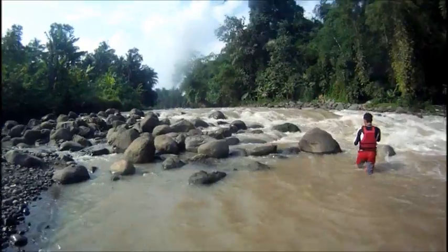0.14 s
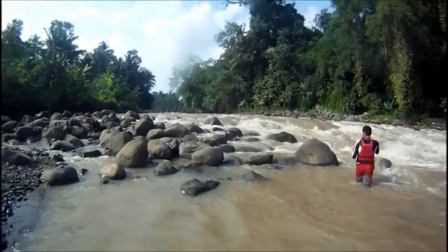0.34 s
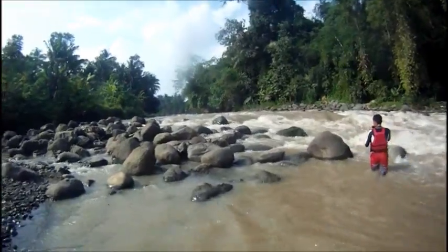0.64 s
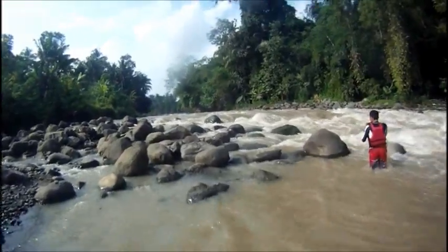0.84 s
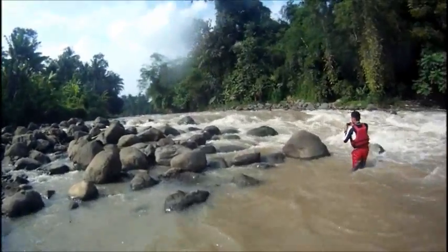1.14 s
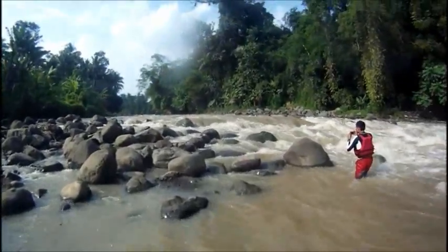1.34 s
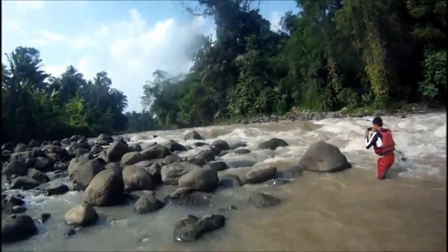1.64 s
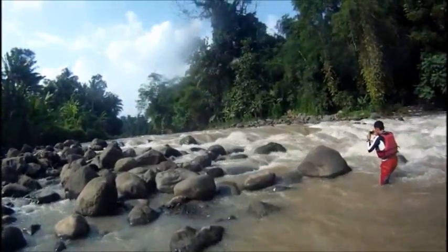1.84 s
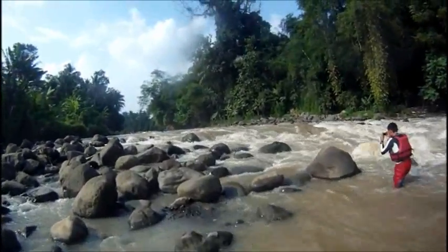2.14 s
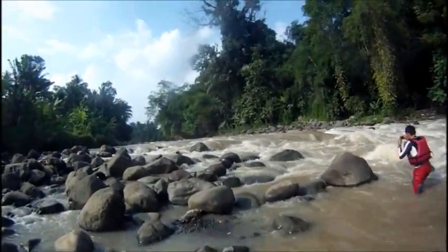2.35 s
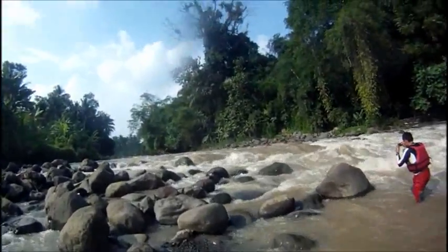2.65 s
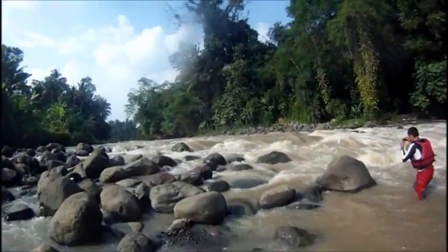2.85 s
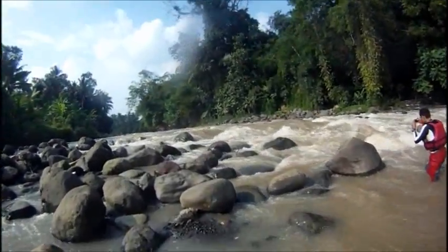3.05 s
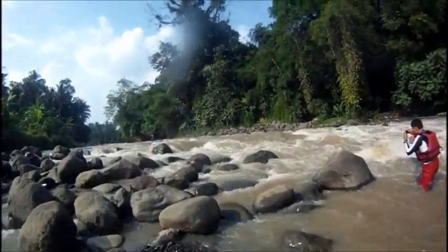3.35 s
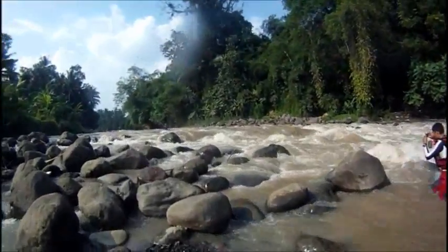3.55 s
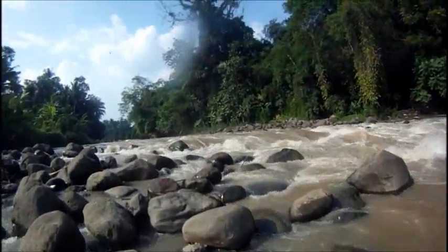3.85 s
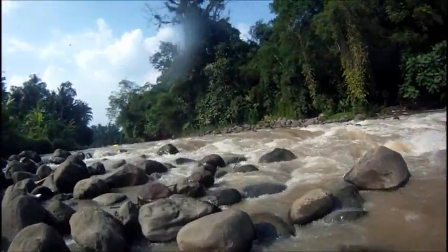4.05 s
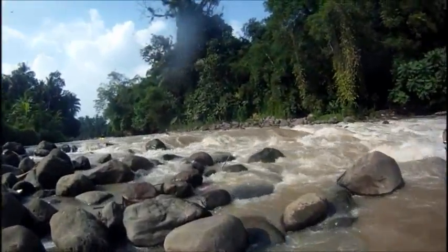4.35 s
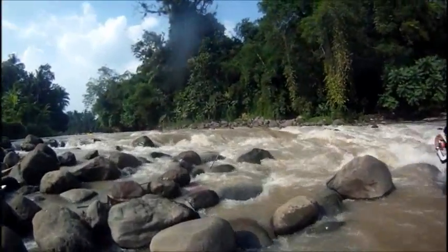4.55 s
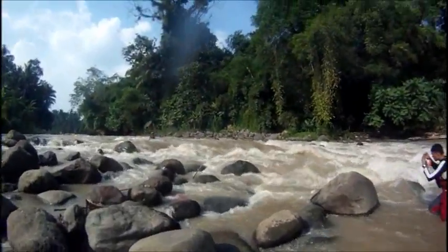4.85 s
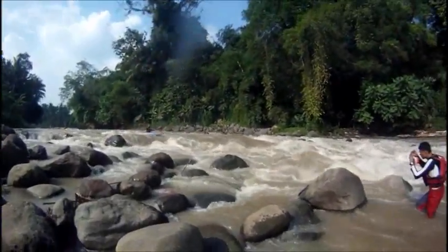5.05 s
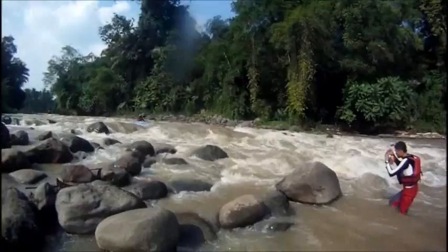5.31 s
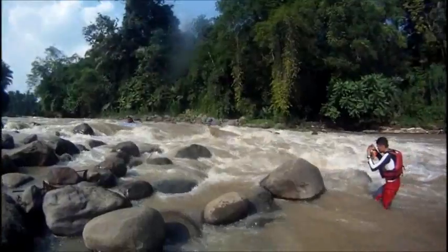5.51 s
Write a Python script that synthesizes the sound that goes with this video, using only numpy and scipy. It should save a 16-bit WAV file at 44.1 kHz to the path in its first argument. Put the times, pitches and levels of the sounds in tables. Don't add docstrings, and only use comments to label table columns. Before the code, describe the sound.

A rocky river roars steadily, muffled and boxy inside a sealed camera housing, while low knocks, thumps and plastic clicks jolt the microphone.

```python
import sys
import numpy as np
from scipy import signal
from scipy.io import wavfile
from scipy.ndimage import uniform_filter1d

SR = 44100
rng = np.random.default_rng(int(sys.argv[2]) if len(sys.argv) > 2 else 0)


def unload_wav(signal):
    wavfile.write(
        sys.argv[1],
        SR,
        np.round(np.clip(np.atleast_2d(signal).T, -1, 1) * 32767).astype(np.int16),
    )


def level_to_linear(level):
    exponent = np.asarray(level, float) / 20
    return 10 ** exponent


N = 250488


def evened(x):
    return x / np.sqrt(np.mean(x ** 2) + 1e-20)


def add(mix, start_s, sound):
    part = mix[round(start_s * SR):][:len(sound)]
    part += sound[:len(part)]


def resonate(x, hz, width_hz):
    radius = np.exp(-np.pi * width_hz / SR)
    turn = np.exp(2j * np.pi * hz / SR)
    return 2 * signal.lfilter([1 - radius], [1, -radius * turn], x).real


def ring(x, modes):
    total = 0
    for k, (hz, width_hz, level_db) in enumerate(modes):
        mode = resonate(resonate(x, hz, width_hz), hz, 2 * width_hz)
        total = total + (-1) ** k * level_to_linear(level_db) * mode
    return total


def noise_field(points, patchy_db, flicker_db, size):
    frames = 4 * N // size + 5
    bin_hz = np.fft.rfftfreq(size, 1 / SR)
    real, imag, patches = rng.standard_normal((frames, len(bin_hz), 3)).T
    patches = uniform_filter1d(patches, size=5, axis=0)
    patches = evened(uniform_filter1d(patches, size=9, axis=1))
    flicker = evened(uniform_filter1d(rng.standard_normal(frames), size=3))
    hz, level_db = np.transpose(points)
    field_db = np.interp(np.log(bin_hz + 1), np.log(hz + 1), level_db)[:, None]
    field_db = field_db + patchy_db * patches + flicker_db * flicker
    spectra = (real + 1j * imag) * level_to_linear(field_db)
    return evened(signal.istft(spectra, nperseg=size, noverlap=3 * size // 4)[1][:N])


# pitch_hz, width_hz, level_db
SHELL_MODES = [
    (640, 940, -7),
    (883, 325, 11),
    (1060, 520, -0.5),
    (1565, 243, 5.5),
]
# pitch_hz, width_hz, level_db
UPPER_MODES = [
    (2072, 496, 5.5),
    (2330, 210, -2.5),
]


def splashes(per_s, spread_db):
    modes = SHELL_MODES[-1:] + UPPER_MODES
    size = level_to_linear(spread_db * np.minimum(rng.exponential(1, N), 3)) * (rng.random(N) < per_s / SR)
    which = rng.integers(0, len(modes), N) == np.arange(len(modes))[:, None]
    decay = np.exp(-1 / (0.02 * SR))
    bursts = rng.standard_normal(N) * signal.lfilter([1], [1, -decay], size * which)
    return evened(sum(ring(burst, [mode]) for burst, mode in zip(bursts, modes)))


# start_s, level_db
ROAR_LEVEL = [(0.03, -46), (0.82, -45), (1.3, -45.5), (1.6, -44.5), (2.37, -45.5), (3.35, -42.5),
              (3.77, -44.5), (4.3, -43.5), (4.9, -43), (5.4, -46), (5.68, -45.5)]
# pitch_hz, level_db [dB per Hz]
ROAR_SPECTRUM = [(180, -26), (300, 2), (330, -12.5), (505, -5.5), (572, -30), (636, -1), (749, -11.5),
                 (786, -5.5), (908, -1.5), (1120, -12), (1390, -5), (1730, -7), (2270, 4), (2800, -10.5),
                 (3000, -48), (3900, -63), (6600, -120)]
# pitch_hz, level_db [dB per Hz]
SPRAY_SPECTRUM = [(1650, -3.5), (2800, -51), (2980, -0.5), (3430, -1.5), (3700, 0), (4090, -8),
                  (4910, -6.5), (5070, -3.5), (5310, -1.5), (5880, -8), (5950, -20), (7740, -40),
                  (13100, -120)]
# pitch_hz, level_db [dB per Hz]
RUMBLE_SPECTRUM = [(11, -32), (18, 5), (54, 8.5), (68, -40), (87, -14), (108, -5), (145, -14), (220, -12.5),
                   (236, -36), (305, -25), (450, -16.5), (580, -45), (990, -120)]


def river(handling):
    t = np.arange(N) / SR
    roar_db = np.interp(t, *np.transpose(ROAR_LEVEL))
    spray_db = -58 + 0.21 * (roar_db + 43.5) + 0.46 * t
    grip_s, grip_follows = 0.012, 0.65
    smooth = 1 / (grip_s * SR)
    effort = signal.lfilter([smooth], [1, smooth - 1], evened(handling) ** 2)
    grip = level_to_linear(-56.5) + level_to_linear(-45.5) * effort ** (grip_follows / 2)
    roar = noise_field(ROAR_SPECTRUM, 0.93, 0.78, size=512) + level_to_linear(-5.0) * splashes(200, 6.6)
    spray = noise_field(SPRAY_SPECTRUM, 1.26, 0.22, size=512)
    rumble = noise_field(RUMBLE_SPECTRUM, 2.6, 1.6, size=2048)
    return level_to_linear(roar_db - 2.5) * roar + level_to_linear(spray_db + 3.5) * spray + level_to_linear(3.5) * grip * rumble


def knock(blow_db, wobble_db, hz, t60_s):
    blow_hz, blow_t60_s = 98.4, 0.028
    t = np.arange(round(0.5 * SR)) / SR
    turns = hz * (t + 0.0024 * (1 - np.exp(-t / 0.0016)))
    wobble = (1 - np.exp(-t / 0.0061)) * level_to_linear(-60 * t / max(t60_s, 0.03)) * np.sin(2 * np.pi * turns)
    blow = (1 - np.exp(-t / 0.013)) * level_to_linear(-60 * t / blow_t60_s) * np.sin(2 * np.pi * blow_hz * t)
    return level_to_linear(wobble_db + 8.5) * wobble + level_to_linear(blow_db + 7.5) * blow


def thud(peak_db, hz):
    t60_s = 0.065
    t = np.arange(round(0.2 * SR)) / SR
    return level_to_linear(peak_db - 60 * t / t60_s) * (1 - np.exp(-t / 0.0015)) ** 2 * np.sin(2 * np.pi * hz * t)


def heave(peak_db, hz):
    turns = hz * np.arange(round(0.1 * SR)) / SR
    u = turns / 0.68
    swell = (u * np.exp(1 - u)) ** 2 * np.exp(-(turns / 1.8) ** 2)
    return level_to_linear(peak_db) * swell * np.sin(2 * np.pi * turns)


# start_s, blow_db, wobble_db, wobble_hz, thud_db
CLAMPED_KNOCKS = [(0.169, -35, -24, 49.5, -28), (0.255, -25, -26, 70, -18), (0.298, -7.5, -22, 90.5, -46),
                  (0.3124, -22, -20, 50, -48), (1.434, -44, -31.5, 78, -33.5), (2.595, -39, -32, 63, -32),
                  (3.2245, -30, -20.5, 56.6, -33.5), (3.535, -56, -37.5, 51.4, -66),
                  (4.168, -43, -12, 57.7, -30.5), (4.734, -27, -28, 50, -25.5),
                  (4.932, -42, -23, 45.4, -40), (5.11, -33, -17.5, 68, -34)]
# start_s, blow_db, wobble_db, wobble_hz, thud_db
LOOSE_KNOCKS = [(0.709, -13.5, -22.5, 62.5, -38), (1.071, -43, -16.5, 57, -32),
                (1.668, -29, -41, 52.4, -37), (3.183, -40, -48, 75.4, -38), (3.2056, -12, -21.5, 60.7, -44),
                (4.07, -31, -59, 75.4, -31.5), (4.278, -44, -20, 54.7, -33.5), (4.398, -53, -53, 46, -36.5),
                (4.481, -38, -34.5, 62, -40), (4.984, -36, -31, 45, -42), (5.161, -18, -24, 67.3, -34),
                (5.197, -36, -27, 49.6, -36.5)]
# start_s, blow_db, wobble_db, wobble_hz, thud_db
FREE_KNOCKS = [(0.495, -17, -18.5, 60.3, -26.5), (1.385, -49, -28.5, 54.4, -60),
               (1.741, -42, -30, 61.8, -29), (2.636, -21, -18, 61, -30.5), (3.3128, -30, -26, 49.6, -44),
               (3.362, -5, -16, 61.6, -37), (3.712, -25, -29.5, 59, -47), (3.985, -52, -33, 68, -26),
               (4.822, -52, -36.5, 59, -32.5), (0.115, -55, -43, 49.5, -62), (0.141, -60, -39, 55, -57),
               (5.27, -60, -42.5, 55, -66), (5.501, -60, -57, 55, -56), (5.591, -60, -54, 52.5, -57)]
# start_s, blow_db, wobble_db, wobble_hz, thud_db
CLAMPED_TUGS = [(0.2172, -41, -18.5, 63, -33), (0.276, -15, -22.5, 46.4, -39),
                (0.402, -55, -27.5, 53, -37.5), (1.037, -26, -35, 68.5, -35),
                (1.202, -52, -37.5, 63.6, -35), (1.332, -46, -27, 49, -33), (1.863, -60, -36.5, 53.3, -64),
                (2.62, -40, -38, 75, -30.5), (2.948, -61, -38.5, 52, -60), (3.028, -34, -27.5, 53, -33),
                (4.095, -44, -15.5, 56.5, -27.5), (4.222, -43, -17, 50, -30), (4.687, -36, -22.5, 57, -37),
                (4.9467, -4, -18, 71, -16.5), (4.9625, -9, -24, 71.4, -36), (5.06, -35, -16.5, 65, -20.5),
                (5.371, -58, -39, 55, -38.5)]
# start_s, blow_db, wobble_db, wobble_hz, thud_db
LOOSE_TUGS = [(0.976, -25, -23.5, 53.7, -33.5), (1.619, -70, -58, 64, -58), (2.003, -51, -40, 51, -63),
              (2.091, -54, -44, 53, -60), (2.364, -53, -48, 59.5, -58), (2.79, -29, -29, 62.3, -26),
              (3.059, -46, -31.5, 50.5, -63), (3.958, -43, -45, 44.2, -57), (4.37, -48, -33, 56, -60),
              (4.7585, -20, -24, 54.3, -55), (5.003, -39, -23.5, 54.7, -55), (5.149, -24, -30, 48.2, -55)]
# start_s, peak_db, pitch_hz
DEEP_THUDS = [
    (0.273, -23.5, 198),
    (0.293, -18.5, 197),
    (0.3087, -24.5, 198),
    (0.7107, -25, 210),
    (3.2072, -17.5, 182),
    (3.222, -39, 190),
    (3.362, -24, 196),
    (4.96, -30, 198),
    (4.979, -23, 192),
    (5.198, -43, 198),
]
# start_s, peak_db, pitch_hz
SHOVES = [
    (0.1688, -12.5, 76),
    (0.16, -22, 38),
    (4.745, -20, 47),
    (0.2546, -5, 88),
    (4.7345, -6.5, 89),
    (2.594, -26.5, 72),
]
# start_s, peak_db, pitch_hz
YANKS = [
    (3.179, -28, 75),
    (3.294, -32, 60),
    (3.3075, -32, 120),
    (2.6195, -26, 72),
    (4.9461, -13.5, 150),
    (4.963, -9, 81.5),
    (4.9808, -19, 130),
]


def housing():
    wall_hz, thud_lead_s = 249.2, 0.0022
    mix = np.zeros(N)
    for way, t60_s, table in ((0.84, 0.095, CLAMPED_KNOCKS), (0.98, 0.14, LOOSE_KNOCKS), (1, 0.22, FREE_KNOCKS),
                              (-1.43, 0.08, CLAMPED_TUGS), (-1.29, 0.15, LOOSE_TUGS)):
        for start_s, blow_db, wobble_db, hz, thud_db in table:
            add(mix, start_s, way * knock(blow_db, wobble_db, hz, t60_s))
            add(mix, start_s - thud_lead_s, thud(thud_db, wall_hz))
    for start_s, peak_db, hz in DEEP_THUDS:
        add(mix, start_s, thud(peak_db, hz))
    for way, table in ((0.98, SHOVES), (-0.88, YANKS)):
        for start_s, peak_db, hz in table:
            add(mix, start_s, way * heave(peak_db, hz))
    return mix


def rattle(noise, length_s, rise_s):
    t = np.arange(len(noise)) / SR
    return noise * (1 - np.exp(-t / rise_s)) * np.exp(-t / np.clip(length_s, 0.0006, 0.03))


# pitch_hz, width_hz, level_db
TREBLE_MODES = [
    (1620, 310, 8.5),
    (2410, 980, 1),
    (3694, 330, 2.5),
    (4400, 500, -8),
    (5340, 790, -3.5),
]


def spatter(noise, peak_db, length_s):
    drive = rattle(noise, length_s, 0.00066)
    peak = abs(ring(drive, TREBLE_MODES[2:])).max()
    return level_to_linear(peak_db - 2.5) * ring(drive, TREBLE_MODES) / peak


def tick(noise, peak_db, hz, upper_db, length_s):
    drive = rattle(noise, length_s, 0.00011)
    drive[0] += 6.3
    near = [(f, w, db + 0.5 - 14.2 * abs(np.log2(f / hz))) for f, w, db in SHELL_MODES]
    body = ring(drive, [(hz, 320, 0)]) + ring(drive, near)
    upper = ring(drive, UPPER_MODES)
    return level_to_linear(peak_db - 1.0) * body / abs(body).max() + level_to_linear(upper_db + 2.0) * upper / abs(upper).max()


def snap(peak_db, hz, upper_db):
    push_s = 0.00007
    drive = np.exp(-((np.arange(600) / SR - 0.0002) / push_s) ** 2)
    body = ring(drive, [(hz, 590, 0)])
    upper = ring(drive, [(2140, 680, 0)])
    return level_to_linear(peak_db) * body / abs(body).max() + level_to_linear(upper_db) * upper / abs(upper).max()


# start_s, peak_db
SPATTERS = [(0.155, -40), (0.207, -37), (0.256, -40), (0.281, -54), (0.397, -41), (0.708, -43),
            (0.973, -34.5), (1.108, -44), (1.1204, -39), (2.549, -38), (2.5731, -42), (2.584, -40),
            (2.601, -44), (3.007, -43), (3.066, -40.5), (3.169, -42), (3.368, -38.5), (3.6567, -42),
            (3.9125, -48), (3.9504, -35.5), (4.03, -37.5), (4.0345, -36), (4.688, -48), (4.94, -34),
            (4.9485, -32), (4.959, -38), (4.965, -33), (5.252, -40), (5.3482, -43), (5.363, -40)]
# start_s, peak_db, pitch_hz, upper_db
TICKS = [(0.17, -19.5, 1060, -38), (0.216, -29, 721, -32.5), (0.2552, -17.5, 910, -42),
         (0.275, -30, 670, -35), (0.297, -30, 960, -36), (0.497, -21.5, 1060, -60), (1.333, -32, 945, -41),
         (1.725, -37, 861, -31), (1.74, -24.5, 930, -36), (2.585, -30, 720, -40), (2.6203, -33, 1000, -30),
         (2.785, -30.5, 657, -60), (3.028, -27.5, 980, -32), (3.2065, -32, 890, -37),
         (3.3631, -22.5, 1040, -35), (3.956, -30.5, 656, -35), (3.986, -22, 920, -27),
         (4.094, -24.5, 780, -29.5), (4.169, -24, 1060, -47), (4.279, -30.5, 1040, -57),
         (4.506, -51, 1000, -34), (4.7362, -20, 1010, -33), (4.942, -22.5, 990, -27),
         (4.9595, -26, 735, -31), (4.981, -31, 724, -40), (5.0612, -22.5, 980, -27.5)]
# start_s, peak_db, pitch_hz
RATTLES = [(0.18, -29, 870), (0.262, -36, 552), (0.309, -36, 566), (0.71, -39, 716), (1.037, -40, 890),
           (1.071, -34.5, 865), (1.202, -38, 690), (2.475, -39.5, 894), (2.572, -30.5, 830),
           (2.64, -34.5, 1000), (3.222, -41, 684), (4.067, -33.5, 853), (4.076, -38, 797),
           (4.22, -31.5, 850), (4.261, -36, 818), (4.388, -37, 651), (4.399, -38, 700), (4.686, -39, 720),
           (4.991, -31.5, 730), (5.002, -40, 694), (5.109, -35, 872), (5.165, -37.5, 859),
           (5.173, -41, 552), (5.188, -37.5, 886)]
# start_s, peak_db, pitch_hz, upper_db
SNAPS = [(0.4975, -28, 520, -43), (0.7093, -33, 900, -38), (0.9755, -32, 696, -39),
         (1.0705, -33.5, 800, -44), (2.788, -33, 800, -44), (3.3625, -28, 520, -45),
         (4.9468, -28, 520, -32), (5.0604, -18.5, 1000, -22), (5.0615, -20.5, 1000, -28),
         (0.1875, -45, 900, -27), (0.2095, -43, 900, -29), (4.9427, -30, 1010, -30),
         (4.7473, -30, 900, -42), (0.2748, -40, 800, -32), (0.2979, -20, 1180, -26),
         (0.308, -34, 1000, -31), (1.333, -27, 950, -33), (1.741, -24, 1600, -32),
         (2.6199, -21.5, 980, -24), (3.2061, -20.5, 1200, -30), (3.2195, -30, 890, -45),
         (4.506, -44, 1000, -27), (4.7356, -19, 1020, -28), (4.9448, -13.5, 1090, -27),
         (4.9454, -19, 1500, -16.5), (4.9606, -32, 1000, -23), (4.9773, -35, 1000, -31),
         (4.9806, -28, 1100, -34), (4.992, -26, 1000, -34)]
# start_s, peak_db, upper_db
CREAKS = [(0.196, -45, -28), (0.665, -32.5, -44), (0.976, -33.5, -45), (1.48, -32, -32),
          (1.627, -34, -30.5), (1.666, -34.5, -41), (1.696, -37, -36), (1.753, -22.5, -26),
          (2.174, -34, -43), (2.267, -58, -31), (2.534, -39, -36.5), (2.973, -50, -35.5),
          (3.769, -33.5, -48), (4.027, -30, -39), (4.596, -31.5, -38.5)]
# start_s, peak_db
SCRAPES = [(0.662, -37), (1.482, -38), (1.742, -38), (1.7554, -38.5), (1.775, -42), (2.2579, -35.5),
           (2.272, -44), (2.961, -37.5), (3.769, -38.5), (4.7374, -55), (5.278, -46.5)]


def shell():
    tick_s, rattle_s, creak_s, spatter_s, scrape_s = 0.003, 0.0099, 0.0027, 0.0042, 0.022
    creak_hz, rattle_upper_db = 1750, -14
    ticks = [(*row, tick_s) for row in TICKS]
    ticks += [(s, db, hz, db + rattle_upper_db, rattle_s) for s, db, hz in RATTLES]
    ticks += [(s, db, creak_hz, upper_db, creak_s) for s, db, upper_db in CREAKS]
    hisses = [(*row, spatter_s) for row in SPATTERS] + [(*row, scrape_s) for row in SCRAPES]
    mix = np.zeros(N)
    for sound, table in ((tick, ticks), (spatter, hisses)):
        for noise, (start_s, *row) in zip(rng.standard_normal((len(table), 4000)), table):
            add(mix, start_s, sound(noise, *row))
    for start_s, *row in SNAPS:
        add(mix, start_s, snap(*row))
    return mix


# pitch_hz, width_hz, level_db
DIPS = [
    (1280, 146, -6.5),
    (2800, 310, -4.5),
]


def scene():
    handling = housing()
    mix = river(handling) + handling + shell()
    for hz, width_hz, level_db in DIPS:
        mix = mix - (1 - level_to_linear(level_db)) * resonate(mix, hz, width_hz)
    return mix[None]


def thin_treble(x):
    top_hz, top_opens_db = 15350, -46.5
    hz, t, z = signal.stft(x, SR, nperseg=1024, noverlap=768)
    power = abs(z) ** 2
    loud_db = 10 * np.log10(uniform_filter1d(power.sum(axis=1), size=25) + 1e-12)
    drift = evened(uniform_filter1d(rng.standard_normal(len(t)), size=24))
    bar_db = -102 + 0.45 * np.maximum(loud_db + 38, 0) + 2.5 * drift
    local = uniform_filter1d(uniform_filter1d(power, size=7, axis=2), size=3, axis=1)
    heard = (local > level_to_linear(2 * bar_db)) | (hz < 3600)[:, None]
    keep = uniform_filter1d(heard * 1.0, size=3, axis=2)

    def band(mask):
        return signal.istft(z * mask, SR, nperseg=1024, noverlap=768)[1][:, :N]

    body = band(keep * (hz <= top_hz)[:, None])
    treble = band(((hz > 13000) & (hz < 15000))[:, None])
    top = band(((hz > top_hz) & (hz < 16300))[:, None])
    ticking = uniform_filter1d(treble ** 2, size=130) > level_to_linear(2 * top_opens_db)
    return body + uniform_filter1d(ticking * 1.0, size=130) * level_to_linear(-6) * top


def band_limit(x):
    return signal.sosfilt(signal.butter(12, 16460, fs=SR, output="sos"), x)


def record(dry):
    clock_hz, hiss_db = 12000, -86
    opening = np.clip((np.arange(N) / SR - 0.028) / 0.014, 0, 1) ** 2 + level_to_linear(-69)
    slow = signal.resample_poly(dry * opening, clock_hz, SR, axis=1, window=("kaiser", 5))
    steps = np.repeat(slow, 4, axis=1)
    held = signal.resample_poly(steps, SR, 4 * clock_hz, axis=1)[:, :N]
    hiss = level_to_linear(hiss_db) * rng.standard_normal(held.shape)
    mix = thin_treble(held + hiss)
    return band_limit(mix)


dry = scene()
out = record(dry)
unload_wav(out)
```